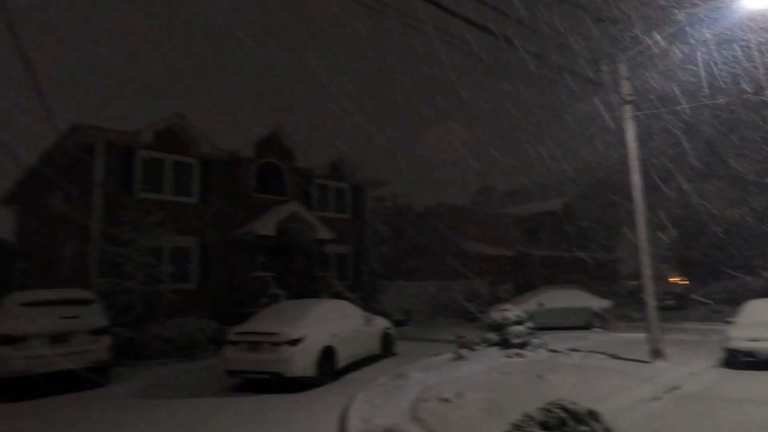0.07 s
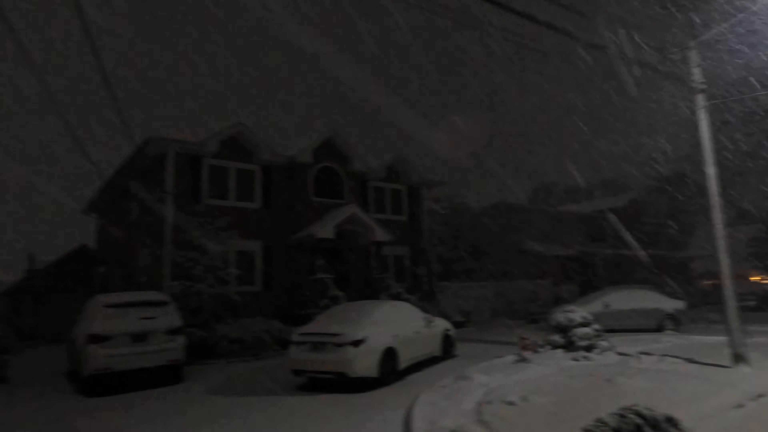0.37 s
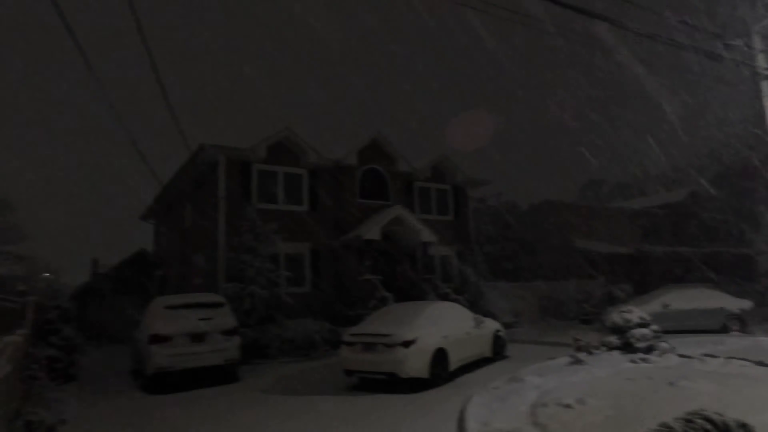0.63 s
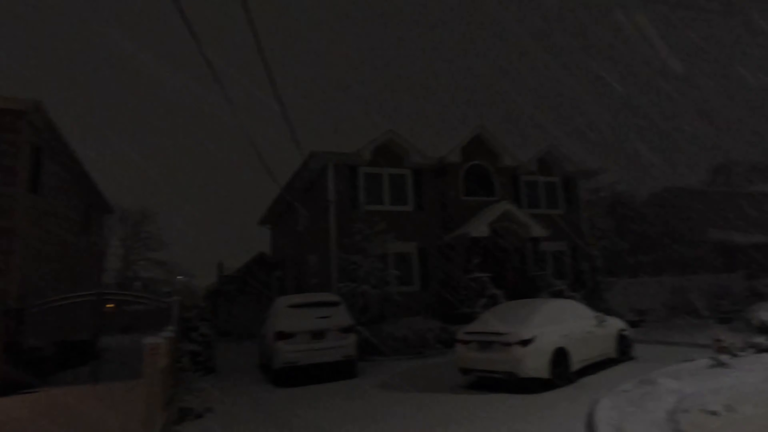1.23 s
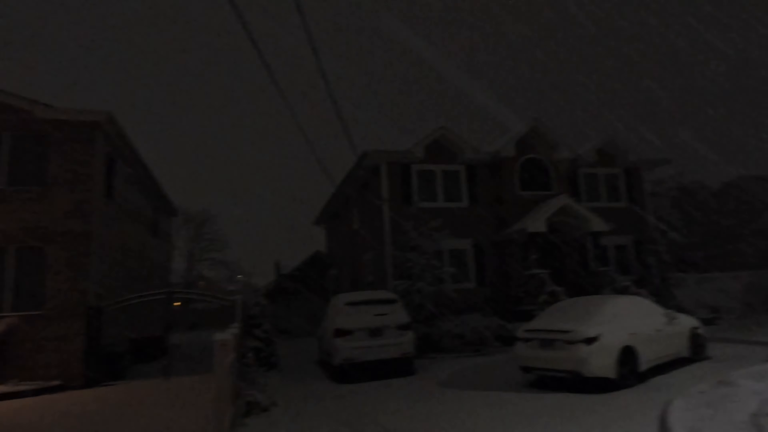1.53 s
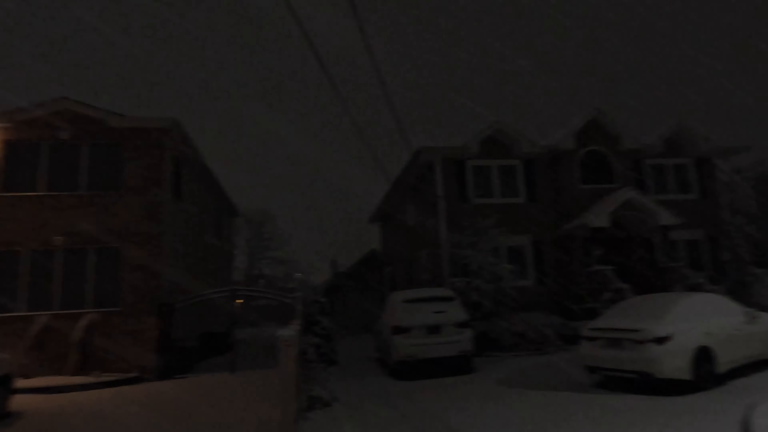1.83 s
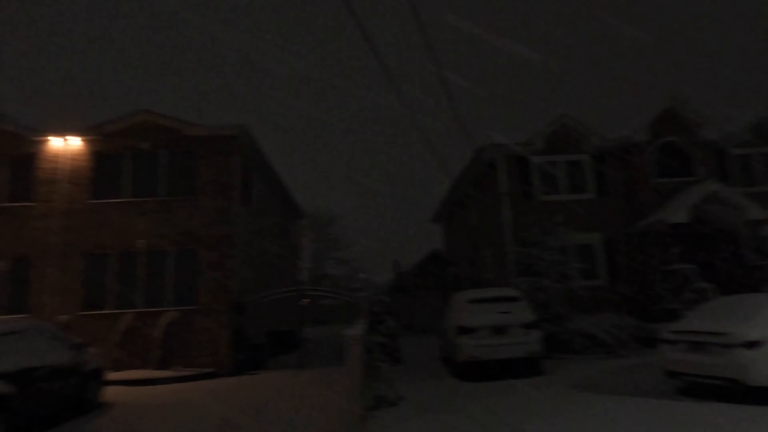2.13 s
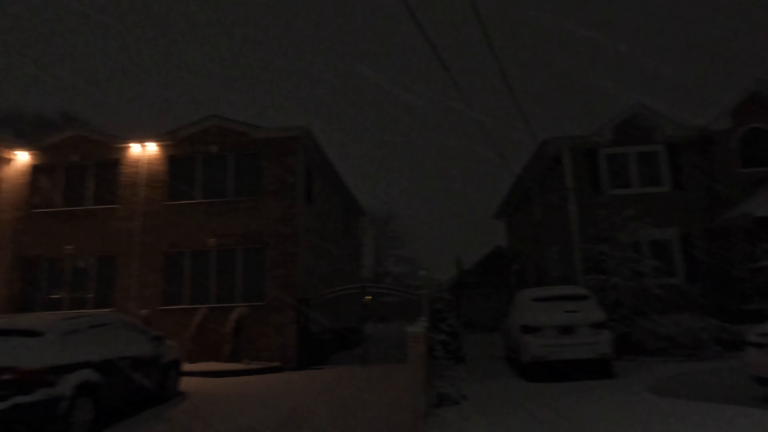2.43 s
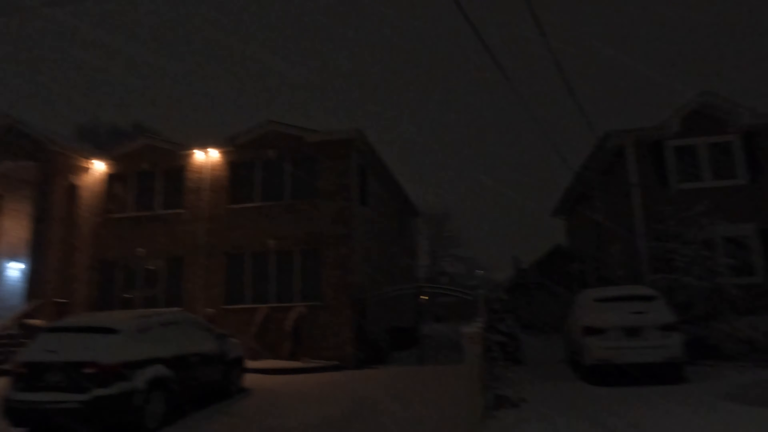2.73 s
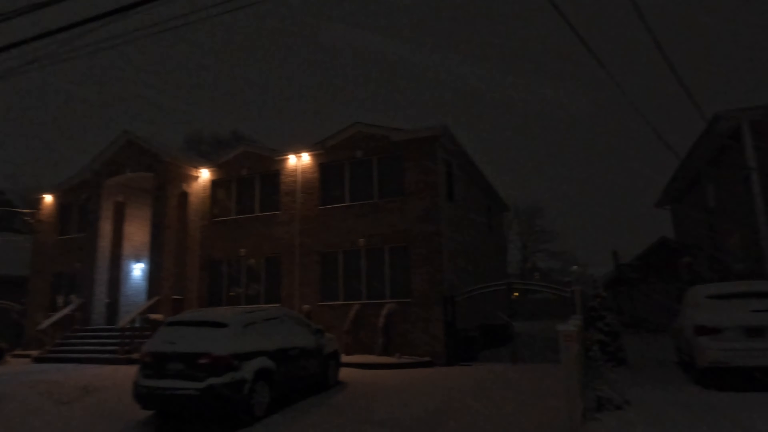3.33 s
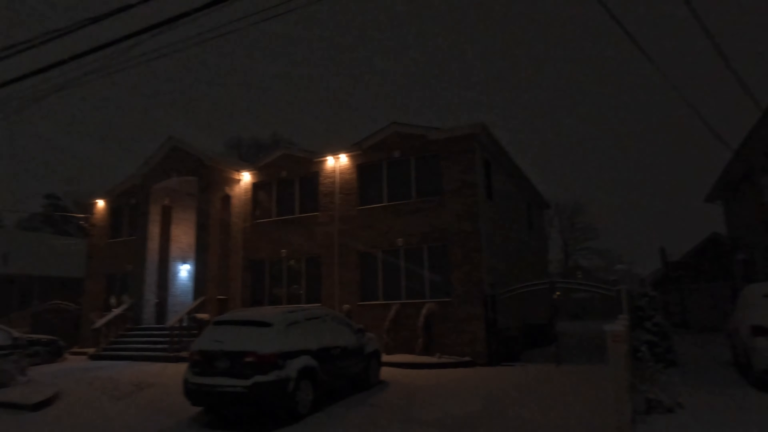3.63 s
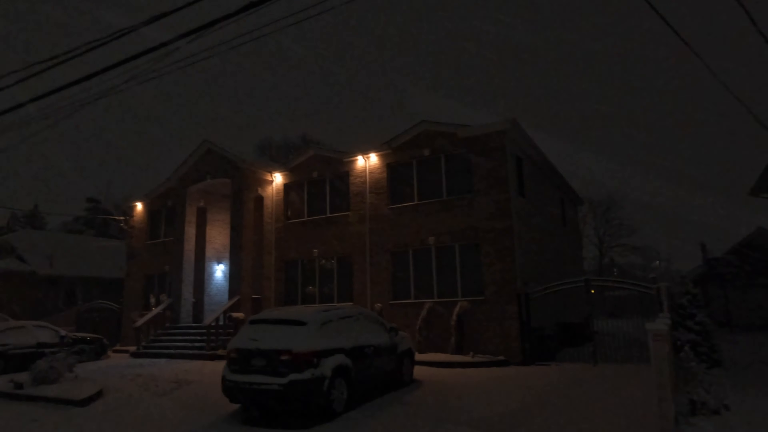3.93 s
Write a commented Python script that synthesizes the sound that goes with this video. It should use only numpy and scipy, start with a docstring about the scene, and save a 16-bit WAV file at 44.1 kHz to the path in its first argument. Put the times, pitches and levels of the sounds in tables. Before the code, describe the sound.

A light wind gust buffets the microphone, then calms to distant traffic and faint ticks.

```python
"""Wind on a snowy street

Turbulent pressure rumbles on the two microphone ports of a hand-held camera, swells into one
fluttering gust and pulses low in the calm, over a wash of distant traffic and a faint hiss. Icy flakes
tick on the housing and excite its resonances. Friction makes a sleeve swish and a glove creak, while
the hand thuds and clicks on the camera body."""
import sys
import numpy as np
from scipy import signal
from scipy.io import wavfile
from scipy.ndimage import uniform_filter1d

SR = 44100
rng = np.random.default_rng(int(sys.argv[2]) if len(sys.argv) > 2 else 0)


def persist_wave(psi):
    """Save psi, clipped to +-1, as 16-bit WAV."""
    counts = np.round(np.clip(psi, -1, 1) * 32767).astype(np.int16)
    wavfile.write(sys.argv[1], SR, np.atleast_2d(counts).T)


N = 176400
TIME = np.arange(N) / SR

# distant traffic and microphone hiss: (time [s], level [dB])
TRAFFIC_LEVEL = [(0, -52), (.9, -54), (1.6, -56), (2.1, -55.5), (2.6, -51.5), (3.05, -50), (3.6, -50),
                 (4, -50)]
HISS_LEVEL = [(0, -74.5), (2, -75.5), (2.6, -72.5), (4, -72)]
# their spectra: (frequency [Hz], relative density [dB])
TRAFFIC_SPECTRUM = [(100, 2.5), (280, -1.5), (450, -7), (750, -12), (1250, -10.5), (1800, -17.5),
                    (2600, -24.5), (3500, -32), (5000, -47), (8000, -47.5)]
HISS_SPECTRUM = [(2000, -3.5), (4000, -1), (5500, 4), (7300, 0.5), (8800, -3.5), (11000, -5.5), (12300, -8),
                 (13500, -22), (16000, -26.5)]
# their likeness at the two ports: (frequency [Hz], correlation [1])
TRAFFIC_LIKENESS = [(100, 1), (500, 0.95), (1500, 0.65), (2600, 0.55), (5000, 0.33)]
HISS_LIKENESS = [(2000, 0.63), (12000, 0.084)]

# glove and sleeve strokes: (peak time [s], rise [s], decay [s], level [dB])
CREAKS = [(2.204, 0.02, 0.022, -52), (2.2255, 0.0005, 0.0077, -51), (2.273, 0.0041, 0.005, -43.5),
          (2.2915, 0.0019, 0.007, -41.5), (2.95, 0.0084, 0.013, -57.5), (3.058, 0.011, 0.013, -51),
          (3.606, 0.0037, 0.0042, -51), (3.85, 0.0055, 0.012, -50.5), (3.937, 0.0053, 0.0046, -40)]
SWISHES = [(.422, 0.013, 0.026, -58), (.446, 0.0022, 0.0095, -56.5), (.464, 0.0068, .014, -56.5),
           (.508, .005, 0.0092, -63), (1.65, 0.016, .02, -65)]
# their spectra: (frequency [Hz], relative density [dB])
GLOVE_SPECTRUM = [(200, -1.5), (600, -6.5), (1200, 8.5), (1900, -4), (2700, -6), (3800, -14.5),
                  (6000, -26.5), (9000, -31.5), (14000, -28)]
SLEEVE_SPECTRUM = [(1000, -4), (1800, 2), (2500, 7.5), (3500, -14.5), (5500, -15.5), (9000, -28.5)]

# quick slips of the grip: (time [s], relative level [dB], cut-off [Hz])
SLIPS = [(2.2262, -14, 1400), (2.288, -22, 1800), (2.29, -8, 990), (2.2919, -12, 2070), (2.7604, -2, 1600),
         (2.7623, -2.5, 5500), (2.7634, -5.5, 2500), (2.7645, -2, 3000), (3.0644, -17, 2220),
         (3.8498, -24, 1000), (3.9372, -14, 1180), (3.9398, -20.5, 1390)]
# soft low thuds of the hand and, in the last four rows, low pulses of the calm wind rumble:
# (time [s], relative level [dB], cut-off [Hz])
LOW_PULSES = [(2.2689, -28.5, 800), (2.338, -19.5, 109), (2.535, -22.5, 149), (2.7653, -24, 326),
              (3.12, -15.5, 97), (3.282, -23, 100), (3.392, -23, 89), (3.819, -19.5, 65.4),
              (3.871, -24, 85)]
# modes of the slips, low pulses and flakes: (frequency [Hz], gain [dB], 60 dB decay time [s])
HOUSING_MODES = [(196, -32, 0.013), (770, -42, 0.026), (1145, -37.5, 0.029), (1560, -32, 0.011),
                 (1860, -18.5, 0.0059), (2640, -22.5, 0.0022), (4150, -41, 0.0023), (7200, -46, 0.0042)]
LOW_MODES = [(40, -6, 0.12), (134, -1.5, 0.024), (247, -1.5, 0.017)]
PORT_MODES = [(7610, -7, 0.0037), (8300, -12.5, 0.0034), (11940, -10.5, 0.0026)]
TAP_MODES = [(330, -3.5, .007), (640, 1.5, 0.0097), (1100, -2.5, .004), (2050, -1, .003)]

# flake impacts, in relative levels: (time [s], tick [dB], port ring [dB], dull tap [dB])
FLAKES = [(0.6435, -39.5, -47.5, -54), (0.852, -49, -45.5, -70), (0.932, -45.5, -54, -65),
          (1.036, -47, -39.5, -70), (1.076, -50, -68.5, -70), (1.104, -50.5, -53, -70),
          (1.3483, -46, -70.5, -65), (1.484, -54, -40, -77), (1.932, -55, -54, -74), (1.967, -57, -50, -71),
          (2.2036, -40, -42, -44), (2.2052, -57, -35, -64), (2.2065, -47, -24.5, -62),
          (2.2088, -58, -44, -70), (2.228, -61, -53, -70), (2.463, -52, -51, -74),
          (2.5247, -34.5, -60, -61), (2.845, -43, -32.5, -38.5), (2.889, -48, -49, -68),
          (2.987, -41.5, -53, -60), (3.159, -44.5, -70, -68), (3.2134, -49, -46, -65),
          (3.2395, -39.5, -40, -52), (3.5565, -47, -74, -65), (3.7075, -42.5, -63, -60),
          (3.723, -45.5, -51, -66), (3.806, -42.5, -58, -60)]
# fine flakes: (time [s], nominal rate [1/s])
FINE_RATE = [(0, 1.56), (2, 14), (2.6, 50), (4, 160)]
# shattering ice: (frequency [Hz], relative density [dB])
TICK_SPECTRUM = [(200, 10), (700, 5.5), (1500, 1.5), (3000, -3), (4300, -2.5), (5800, -5.5), (8000, -5),
                 (10000, -14.5), (12500, -11), (15000, -22.5)]

# pressure of large eddies, small eddies and sharp puffs: (time [s], level [dB])
WIND_LEVEL = [(0, -30.5), (.2, -34.5), (.45, -33.5), (.5, -31), (.55, -26), (.72, -29), (.8, -25.5),
              (.9, -29.5), (.96, -20.5), (1.25, -20), (1.282, -22.5), (1.31, -19.5), (1.5, -21),
              (1.57, -24), (1.63, -24.5), (1.67, -20), (1.72, -20.5), (1.75, -24), (1.79, -18),
              (1.85, -22.5), (2.01, -23.5), (2.05, -34), (2.38, -37), (2.48, -39), (2.58, -38), (3.25, -38),
              (3.55, -42), (4, -37.5)]
EDDY_LEVEL = [(0, -54), (.5, -53.5), (.78, -52.5), (.86, -53), (.95, -46.5), (1.06, -35.5), (1.16, -32.5),
              (1.25, -37), (1.33, -34), (1.48, -38), (1.57, -48.5), (1.66, -43), (1.79, -34.5),
              (1.87, -45.5), (1.98, -45), (2.06, -54.5), (4, -80)]
PUFFS = [(0.801, -34.5), (1.068, -28), (1.153, -29), (1.163, -32), (1.177, -35.5), (1.203, -33.5),
         (1.219, -32.5), (1.293, -33), (1.317, -29), (1.349, -26.5), (1.36, -34.5), (1.383, -31.5),
         (1.435, -31.5), (1.473, -32.5), (1.683, -35.5), (1.72, -34.5), (1.752, -30.5), (1.781, -30.5)]
# large and small eddies at the height of the gust: (frequency [Hz], relative density [dB])
RUMBLE_SPECTRUM = [(12, -13.5), (24, -6.5), (37, -3), (55, -3.5), (112, -1.5), (155, -8), (210, -14),
                   (300, -21), (450, -36.5), (800, -58.5), (1600, -71)]
EDDY_SPECTRUM = [(130, 3.5), (220, 0.5), (320, -2.5), (450, -5.5), (700, -14.5), (950, -21.5),
                 (1250, -37.5), (1800, -55), (3000, -66.5)]
# likeness of the rumble at the two ports: (frequency [Hz], correlation [1])
RUMBLE_LIKENESS = [(25, 0.66), (60, 0.9), (300, 0.89)]

GUST_DB, RUMBLE_DB_PER_OCTAVE = -18.5, 16.5   # each such drop below the gust level lowers it an octave
EDDY_TOP_DB, EDDY_DB_PER_OCTAVE = -31.5, 25.5
CALM_DB, FLUTTER_DB = -35, 3.5
PUFF_RISE_S, PUFF_DECAY_S = 0.00049, 0.011
FINE_DB, FLURRY_DB, FRAGMENTS_PER_S = -62.5, 1.5, 810


def from_db(db):
    """Amplitude grows tenfold for every 20 dB."""
    return 10 ** (np.asarray(db) / 20)


def unit_power(x):
    """Division by the RMS value gives unit mean power."""
    return x / np.sqrt(np.mean(x ** 2) + 1e-20)


def in_time(rows):
    """Linear interpolation gives a curve its value at every sample."""
    return np.interp(TIME, *np.transpose(rows))


def at_hz(points, hz):
    """A spectrum is interpolated on a logarithmic frequency axis."""
    f, value = np.transpose(points)
    return np.interp(np.log(hz), np.log(f), value)


def pan(db):
    """A level difference places a source to one side; positive is left."""
    gains = from_db(np.array([[.5], [-.5]]) * db)
    return gains / gains.mean(axis=0)


def drift(hz):
    """Low-passed noise gives slow random motion of unit power."""
    pole = np.exp(-80 * np.pi * hz / SR)   # one step per 40 samples
    slow = signal.lfilter([1], [1, -2 * pole, pole * pole], rng.standard_normal(N // 40 + 2002))[2000:]
    return np.interp(np.arange(N) / 40, np.arange(len(slow)), unit_power(slow))


def bands(spectrum, likeness):
    """In-phase and antiphase noise mix to set the stereo correlation of each third octave."""
    edges = 12.5 * 2 ** (np.arange(32) / 3)
    white = rng.standard_normal((2, 2, N + SR // 4))
    for k, (low, high) in enumerate(zip(edges, edges[1:])):
        hz = np.sqrt(low * high)
        if spectrum[0][0] < hz < spectrum[-1][0]:
            bandpass = signal.butter(3, [low, high], "band", fs=SR, output="sos")
            mid, side = signal.sosfilt(bandpass, white[k % 2])[:, -N:]
            alike = np.clip(at_hz(likeness, hz), -1, 1)
            band = np.sqrt(1 + alike) * mid + np.sqrt(1 - alike) * side * [[1], [-1]]
            yield hz, high - low, unit_power(band)


def noise(spectrum, likeness, flicker_db, octaves=0):
    """Flickering bands add in power to a unit noise whose spectrum can slide by octaves."""
    out, power = 0, 0
    for hz, width, band in bands(spectrum, likeness):
        gain = np.sqrt(width) * from_db(at_hz(spectrum, hz / 2 ** octaves))
        out = out + gain * from_db(flicker_db * drift(9.1)) * band
        power = power + gain ** 2
    return unit_power(out / np.sqrt(power))


def evened(x, window_s):
    """Division by the running RMS value removes swells longer than the window."""
    return x / np.sqrt(uniform_filter1d(np.mean(x ** 2, axis=0), int(window_s * SR)) + 1e-9)


def swells(rows):
    """Each envelope grows and decays exponentially about its peak."""
    return sum(from_db(db) * np.exp(-np.maximum((s - TIME) / rise, (TIME - s) / decay))
               for s, rise, decay, db in rows)


def impulses(s, db):
    """A brief force acts as an impulse."""
    out = np.zeros(N)
    np.add.at(out, (np.atleast_1d(s) * SR).astype(int), from_db(db))
    return out


def tails(hits, decay_s):
    """A leaky integrator gives each impulse an exponential decay."""
    return signal.lfilter([1], [1, -np.exp(-1 / (decay_s * SR))], hits + 1e-18)


def ring(hits, modes):
    """Each mode answers an impulse with a damped sinusoid."""
    out = 0
    for hz, db, t60 in modes:
        r, w = from_db(-60 / (t60 * SR)), 2 * np.pi * hz / SR
        out = out + from_db(db) * signal.lfilter([0, np.sin(w)], [1, -2 * r * np.cos(w), r * r], hits + 1e-18)
    return out


def soft(x, hz):
    """A low-pass filter softens an onset by removing its treble."""
    return signal.sosfilt(signal.butter(2, hz, fs=SR, output="sos"), x + 1e-18)


def traffic():
    """Distant vehicles add incoherently into a wash of noise."""
    wash = noise(TRAFFIC_SPECTRUM, TRAFFIC_LIKENESS, flicker_db=1.73)
    return from_db(in_time(TRAFFIC_LEVEL)) * pan(db=2) * wash


def hiss():
    """The self-noise of the microphones sets a faint treble floor."""
    return from_db(in_time(HISS_LEVEL)) * noise(HISS_SPECTRUM, HISS_LIKENESS, flicker_db=1.7)


def rustles():
    """Friction radiates swells of noise, grainy from the glove and smoother from the sleeve."""
    glove = noise(GLOVE_SPECTRUM, [(500, 1), (3000, .85), (9000, .4)], flicker_db=3)
    glove = unit_power(glove * from_db(5 * drift(260)))
    sleeve = noise(SLEEVE_SPECTRUM, [(1500, .28), (6000, .21)], flicker_db=6.5)
    sleeve = unit_power(sleeve * from_db(-1 * drift(200)))
    return (swells(CREAKS) * glove + swells(SWISHES) * sleeve) * pan(db=5)


def grip():
    """Slips of the grip excite the modes of the plastic housing in short clicks."""
    return sum(soft(ring(impulses(s, db), HOUSING_MODES), hz) for s, db, hz in SLIPS) * pan(db=5)


def low_pulses():
    """Damped low oscillations form soft thuds of the hand and pulses of the calm wind rumble."""
    pulses = sum(soft(soft(ring(impulses(s, db), LOW_MODES), hz), hz) for s, db, hz in LOW_PULSES)
    return -pulses * pan(db=1)


def flakes():
    """Brittle impacts shatter in bursts of noise, tap the body and make the left port resonate."""
    s, tick_db, ring_db, tap_db = np.transpose(FLAKES)
    rate = in_time(FINE_RATE) * unit_power(from_db(FLURRY_DB * drift(5.3)))
    arrivals = rng.random(N) < rate / SR
    fine = arrivals * from_db(FINE_DB + np.minimum(rng.exponential(1, N), 3))
    bursts = tails(impulses(s, tick_db) + fine, decay_s=0.0016)
    ice = noise(TICK_SPECTRUM, [(500, .9), (4000, .6), (12000, .3)], flicker_db=2)
    ticks = from_db(-5.5) * bursts * ice
    taps = ring(impulses(s, tap_db), TAP_MODES)
    hits = impulses(s, ring_db) + fine
    scatter = (rng.random(N) < FRAGMENTS_PER_S / SR) * rng.standard_normal(N)
    fragments = from_db(-13) * tails(hits, decay_s=0.005) * scatter
    port_band = signal.butter(2, [6000, 12500], "band", fs=SR, output="sos")
    port = signal.sosfilt(port_band, ring(hits + fragments, PORT_MODES))
    return (ticks + taps) * pan(db=3.5) + port * pan(db=24)


def flutter():
    """Vortex shedding at the right port makes quick puffs whose spectrum rises with their strength."""
    puffs = swells([(s, PUFF_RISE_S, PUFF_DECAY_S, db) for s, db in PUFFS])
    wobble = unit_power(from_db(FLUTTER_DB * np.tanh(drift(34))))
    pressure = np.hypot(from_db(in_time(EDDY_LEVEL)) * wobble, puffs)
    octaves = (20 * np.log10(pressure) - EDDY_TOP_DB) / EDDY_DB_PER_OCTAVE
    air = noise(EDDY_SPECTRUM, [(200, .81), (1200, .9)], flicker_db=0.5, octaves=octaves)
    return pressure * pan(db=-13.5) * evened(air, window_s=0.012)


def rumble():
    """The turbulent pressure of large eddies grows louder, higher and further right as the wind rises."""
    db = in_time(WIND_LEVEL)
    octaves = (db - GUST_DB) / RUMBLE_DB_PER_OCTAVE
    air = noise(RUMBLE_SPECTRUM, RUMBLE_LIKENESS, flicker_db=1.5, octaves=octaves)
    lean_db = np.clip(db - CALM_DB, 0, 6)
    return from_db(db) * pan(-lean_db) * evened(air, window_s=0.054)


def scene():
    """The pressures of all sources superpose at the two microphones."""
    return rumble() + flutter() + traffic() + hiss() + flakes() + rustles() + grip() + low_pulses()


def record(dry):
    """A steep low-pass filter limits the bandwidth, reaching 70 dB of attenuation at 15.7 kHz."""
    return signal.sosfilt(signal.cheby2(12, 70, 15700, fs=SR, output="sos"), dry)


dry = scene()
out = record(dry)
persist_wave(out)
```